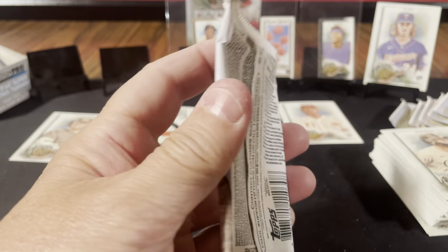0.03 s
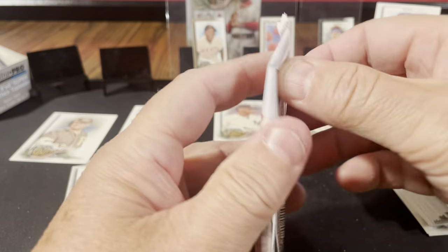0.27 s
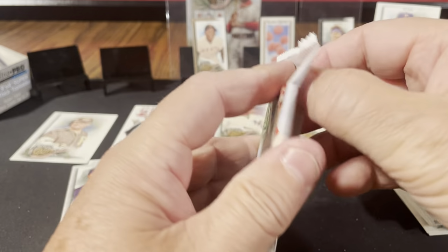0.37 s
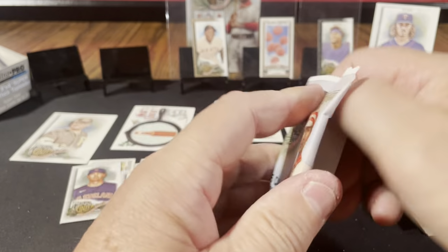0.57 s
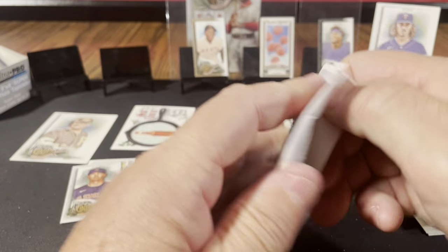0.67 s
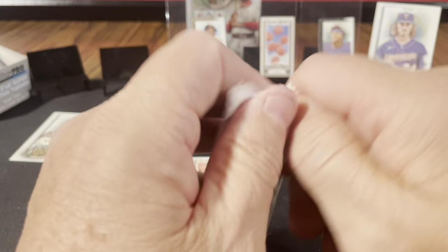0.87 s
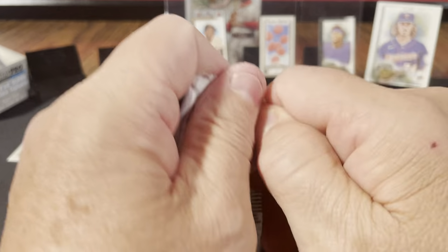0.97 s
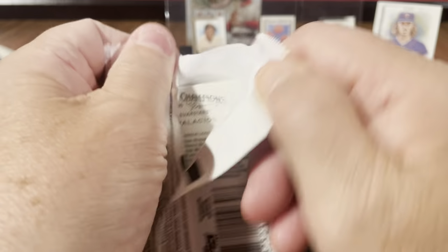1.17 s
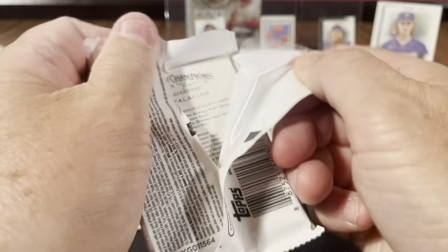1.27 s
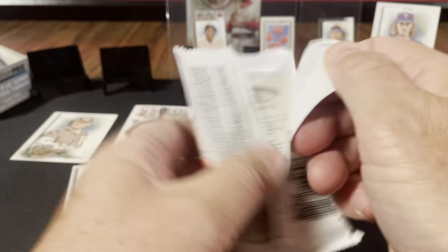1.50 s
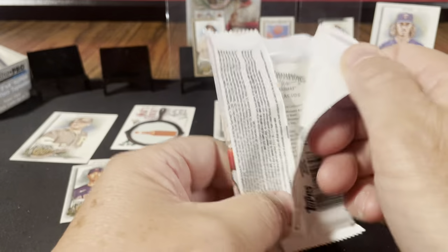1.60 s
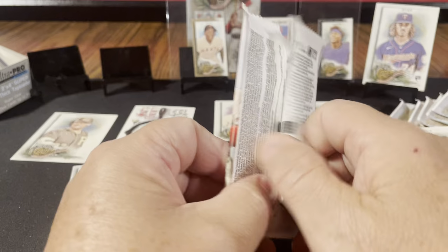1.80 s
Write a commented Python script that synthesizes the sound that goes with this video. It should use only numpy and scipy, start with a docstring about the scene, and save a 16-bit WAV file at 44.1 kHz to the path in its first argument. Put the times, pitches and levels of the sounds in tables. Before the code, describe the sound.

A foil card wrapper is pinched, crinkled and ripped open by hand, snapping sharply up close

```python
"""Sharp foil snaps, dense tearing and soft thuds: two hands pinch, crinkle and rip open a foil card wrapper.
It is held just in front of a camera with two microphone ports, in a small quiet room.
Snaps and crinkles are short noise bursts that ring a facet; tears and sliding are streams of tiny clicks;
thuds and the strong ring of some snaps are brief sine pulses, over a low noise rumble.
A faint noise tail answers as the room."""
import sys
import numpy as np
from scipy import signal
from scipy.fft import rfft, irfft, next_fast_len
from scipy.io import wavfile
from scipy.ndimage import uniform_filter1d, map_coordinates

SR = 44100
rng = np.random.default_rng(int(sys.argv[2]) if len(sys.argv) > 2 else 0)


def unload_audio(sound):
    """Save the sound as a 16-bit wav file, at the path given as the first command line argument."""
    columns = np.transpose(np.atleast_2d(sound))
    # keep every value between -1 and 1, then stretch to whole-number steps
    steps = np.round(np.clip(columns, -1, 1) * 32767)
    wavfile.write(sys.argv[1], SR, steps.astype(np.int16))


N = 81585

# buckling creases: t/s, level/dB before trim and tilt, bass tilt/dB, treble tilt/dB, facet ring f/Hz
CREASES = [(0.0114, -22.5, -7.5, -5, 7000), (0.2058, -22.5, -11, -10, 2210), (0.2125, -19, 2, -17, 2110),
           (0.2196, -9.5, -0.5, 4.5, 2240), (0.2226, -20, 2.5, 11.5, 6500), (0.2998, -17.5, -3.5, 5, 3900),
           (0.3142, -15.5, -3.5, -9, 3120), (0.332, -17.5, -1, -14, 3250), (0.3394, -14.5, -2, -3.5, 3000),
           (0.37, -32, -2, -15, 4220.0), (0.4003, -22, -7.5, -5.5, 2450), (0.4433, -20, 1.5, -7, 5400),
           (0.458, -12.5, -12, 6.5, 3400), (0.4631, -20.5, -7, 4, 3800), (0.4707, -12.5, 2.5, 5, 3620),
           (0.4769, -10.5, 2.5, 5.5, 1120), (0.483, -12, -18, -5, 3800), (0.4957, -19.5, -2.5, -2, 1400),
           (0.5142, -25, -14, 5, 6300), (0.527, -8.5, -5.5, 0.5, 3770), (0.5511, -13.5, -1, 4, 5670),
           (0.5643, -13.5, -4.5, 4, 6000), (0.5714, -20.5, 0.5, -13, 1940), (0.5811, -21.5, -3, 4.5, 5430),
           (0.5898, -29, -1, 2, 4010.0), (0.6288, -21, 4, 3, 3860), (0.6664, -10.5, -2, -0.5, 4970),
           (0.6726, -18, 4, -4, 5200), (0.702, -18.5, 4, 1, 2190), (0.7251, -14.5, -0.5, -29, 1050),
           (0.7504, -25.5, 3, -12, 3550), (0.7932, -12.5, -2, 2.5, 7100), (0.7994, -20.5, -23, 1, 6760.0),
           (0.829, -22, 3.5, 2, 5370), (0.8398, -10.5, -3, -1, 6100), (0.8598, -9, -4, -4.5, 2250),
           (0.8894, -7, -6.5, -1, 3130), (0.9042, -12, -2, -3, 4800), (0.909, -11.5, -11, -0.5, 5450),
           (0.9339, -13, -9, 4, 6700), (0.941, -21.5, -14, 15.5, 6940), (0.9491, -17.5, 0.5, 9, 5750),
           (0.9656, -21, -14, 9.5, 5080.0), (0.987, -5.5, -12.5, -7, 5600), (1.054, -7.5, -1.5, 1, 5000),
           (1.0596, -12, -2, 8, 6600), (1.0896, -7.5, -4, -1.5, 5150), (1.0928, -11, 1, -6, 5100),
           (1.105, -6.5, 1.5, -6, 790), (1.1295, -9.5, -12, 1, 2900), (1.1513, -14, -16, 7.5, 6670),
           (1.1967, -18.5, -24, -6, 4570.0), (1.2061, -8.5, -2.5, 3, 5000), (1.232, -20, -9, 15, 2670),
           (1.2657, -13, -7.5, -1.5, 5570), (1.3297, -40, 15.5, -14, 1150), (1.358, -36.5, 10, 4, 1250),
           (1.373, -19, 1, 3, 5300), (1.3832, -18.5, 0.5, 0.5, 3630), (1.4105, -43.5, 9.5, 4, 1150),
           (1.453, -10.5, 0.5, -2.5, 1600), (1.459, -13.5, -7, -3, 6400), (1.4704, -12, -7, 6, 5700),
           (1.4781, -9, 0, 0, 5300), (1.5, -12, -12, 1, 5200), (1.5444, -12.5, -4.5, -7.5, 3240),
           (1.565, -17.5, -8, -24, 4220.0), (1.5845, -14.5, -2.5, -49, 2400), (1.599, -16.5, -4, -7, 4500),
           (1.602, -20.5, 4, 5.5, 7100), (1.6894, -29.5, 0.5, -3, 3660.0), (1.7116, -28.5, -22, -2, 5170.0),
           (1.7246, -18, -4, -2.5, 1000), (1.7698, -30, 4.5, 1, 4470), (1.7986, -22.5, 0, -1, 4700),
           (1.8325, -19, -11, -8, 4440.0)]
# colour of a snap, close up: f/Hz, level/dB
FOIL_COLOUR = [(60, -36.5), (200, -9), (500, -7.5), (950, 2.5), (1800, -3), (3000, 0.5), (5300, -1),
               (8000, 1), (10500, -1), (13000, -6.5), (15500, -5)]
SNAP_TRIM_DB, SNAP_RISE_S, SNAP_T60_S = -0.5, 0.00043, 0.0076
# shake of the whole sheet, level relative to the crack
SHEET_DB, SHEET_T60_S = -18.5, 0.025
# soft noise swell around the onset of a snap, and how far ahead it starts
SWELL_LEAD_S, SWELL_DB = 0.002, -15.5
# facet ring: the higher it is, the broader
RING_DB, RING_WIDTH_HZ, RING_WIDTH_SHARE = 7.5, 275, 0.079
# the bass tilt acts below the first edge, the treble tilt above the second
BASS_HZ, TREBLE_HZ = 2160, 7100

# runs of tearing: start t/s, length/s, level/dB, bass tilt/dB
TEAR_RUNS = [(0.44, 0.016, -32, 2.5), (0.463, 0.025, -24.5, 1.5), (1.049, 0.054, -22.5, -0.5),
             (1.102, 0.031, -24, 8), (1.128, 0.027, -33, -4), (1.193, 0.036, -29, -0.5),
             (1.228, 0.0093, -22.5, -5), (1.237, 0.022, -32.5, 5), (1.284, 0.0064, -29, 3.5),
             (1.465, 0.028, -29.5, 7), (1.818, 0.037, -33, 3)]
# colour of the tearing seam: f/Hz, level/dB
SEAM_COLOUR = [(60, -21.5), (180, -3.5), (400, -5.5), (1000, -4), (2000, -2), (3500, 0.5), (5200, 1.5),
               (7500, -0.5), (11000, -4), (15500, -4)]
TEAR_RISE_S, TEAR_FALL_S, BREAKS_PER_S, BREAK_SPREAD_DB = 0.0017, 0.0065, 1500, 1.5
# the tear catches and slips: random points per second, swing to either side
CATCHES_PER_S, CATCH_SWING_DB = 330, 2

# small crinkles: level relative to the sliding, scatter to either side, range of the facet rings
CRINKLES_PER_S, CRINKLE_DB, CRINKLE_SPREAD_DB = 60, 3.5, 3.5
CRINKLE_LOW_HZ, CRINKLE_HIGH_HZ = 604, 4030

# foil sliding under the fingers: t/s, level/dB
SLIDE_LEVEL = [(0, -52), (.1, -68), (.19, -82), (.21, -35.5), (.265, -51.5), (.295, -45.5), (.42, -49.5),
               (.49, -43), (.54, -42), (.59, -35.5), (.61, -52), (.65, -51.5), (.68, -39), (.78, -42),
               (.83, -36), (.92, -35), (1.02, -43), (1.1, -22.5), (1.17, -47.5), (1.27, -36), (1.32, -57.5),
               (1.37, -43), (1.44, -47), (1.52, -34.5), (1.61, -39), (1.66, -50.5), (1.79, -47),
               (1.85, -53)]
# colour of the sliding: f/Hz, level/dB
RUB_COLOUR = [(60, -16.5), (200, -0.5), (500, -1.5), (1000, -4.5), (1800, -3.5), (3500, 2.5), (5200, 2.5),
              (8000, 1.5), (11000, 0), (15500, -12)]
SLIDE_GRAINS_PER_S, SLIDE_SPREAD_DB = 3500, 3.5

# soft thuds and the strong ring of some snaps: centre t/s, level/dB, f/Hz, bell half-length/s (to 1/e)
PULSES = [(.2206, -10, 2318, 0.0012), (0.242, -49.5, 65, 0.011), (0.366, -41, 46, 0.02),
          (0.412, -52.5, 61.7, 0.02), (0.501, -45.5, 84.8, 0.012), (0.577, -37, 403, 0.0047),
          (1.1, -44.5, 56, 0.044), (1.119, -31.5, 185.7, 0.01), (1.2867, -26.5, 602, 0.0015),
          (1.465, -45, 160, 0.011), (1.483, -21.5, 1204, 0.0015), (1.572, -47, 72.3, 0.033)]
# colour of the handling rumble: f/Hz, level/dB
RUMBLE_COLOUR = [(20, -33), (50, -1.5), (250, -11), (3000, -43)]
# handling rumble: t/s, level/dB
RUMBLE_LEVEL = [(.19, -71.5), (.25, -66), (.7, -63.5), (1.12, -52.5), (1.35, -60.5), (1.52, -55),
                (1.7, -63)]

# between the microphone ports: f/Hz, phase by which left leads/rad
PORT_LEAD = [(1400, 0), (2700, 1.23), (3800, 0.81), (5200, -0.55), (6460, -0.95), (7840, -2.5),
             (8600, -3.5), (10900, -6.5), (12300, -6), (14300, -9.5), (16000, -9.5)]
# between the microphone ports: f/Hz, left over right/dB
PORT_LEVEL = [(60, 1), (200, 3), (1300, 2.5), (4400, 4.5), (8100, 0)]
# between the microphone ports: f/Hz, likeness (0-1)
PORT_LIKENESS = [(100, 0.79), (700, 0.93), (2400, 0.83), (5500, 0.8), (8200, 1), (11000, 0.65), (15000, 1)]

# decay of the small room: f/Hz, t60/s
ROOM_DECAY = [(2400, 0.24), (6000, 0), (14000, 0.38)]
# colour of the room tail: f/Hz, level/dB
ROOM_TONE = [(1400, -3.5), (2350, 2.5), (3400, 0), (14000, -4.5)]
ROOM_DB = -21.5
TOP_HZ = 15900  # band limit of the camera


def snaps():
    """The large creases buckle close up, each with its own weight and brightness."""
    out = np.zeros((2, N))
    for s, db, bass_db, treble_db, ring_hz in CREASES:
        def tilt(hz):
            return bass_db * below(hz, BASS_HZ) + treble_db * (1 - below(hz, TREBLE_HZ))
        snap = coloured(crack(ring_hz), tilt)
        add(out, s - SWELL_LEAD_S, amp(db + SNAP_TRIM_DB) * snap)
    return out


def crack(ring_hz):
    """A buckling crease: a soft swell of noise, a crack of milliseconds that rings its facet, a sheet shake."""
    t = np.arange(2048) / SR - SWELL_LEAD_S
    after = np.maximum(t, 0)
    rise = 1 - np.exp(-(after / SNAP_RISE_S) ** 2)
    snap = amp(-60 * after / SNAP_T60_S)
    sheet = amp(SHEET_DB - 60 * after / SHEET_T60_S)
    swell = amp(SWELL_DB) * np.exp(-2 * np.abs(t) / SWELL_LEAD_S)

    def facet(hz):
        width_hz = RING_WIDTH_HZ + RING_WIDTH_SHARE * ring_hz
        return along(FOIL_COLOUR, hz) + RING_DB * np.exp(-((hz - ring_hz) / width_hz) ** 2)

    x = coloured(burst(rise * (snap + sheet) + swell), facet)
    # the energy of 1 ms at rms 1
    return x * np.sqrt(SR / 1000 / np.sum(x ** 2, axis=1, keepdims=True))


def burst(shape):
    """A pair of noise bursts of the given shape, broadly flat in spectrum but ragged in detail."""
    x = shape * rng.standard_normal((2, len(shape)))
    grid = np.fft.rfftfreq(len(shape), 1 / SR)
    power = np.abs(rfft(x)) ** 2
    smooth = np.abs(uniform_filter1d(uniform_filter1d(power, size=101), size=101))
    # dividing by the smoothed spectrum leaves only the fine detail
    flat = [coloured(c, lambda hz: -10 * np.log10(np.interp(hz, grid, p) + 1e-12))
            for c, p in zip(x, smooth)]
    return np.array(flat)


def tearing():
    """The seam gives way in runs of dense tiny breaks, catching and slipping as it goes."""
    out, t = np.zeros((2, N)), np.arange(N) / SR
    catch = map_coordinates(2 * rng.random(N) - 1, [t * CATCHES_PER_S])
    uneven = grains(BREAKS_PER_S, BREAK_SPREAD_DB) * amp(CATCH_SWING_DB * catch)
    breaks = coloured(uneven, lambda hz: along(SEAM_COLOUR, hz))
    for s, length, db, bass_db in TEAR_RUNS:
        corners = [s - TEAR_RISE_S, s, s + length, s + length + TEAR_FALL_S]
        run = np.interp(t, corners, [0, 1, 1, 0]) ** 2
        piece = run * coloured(breaks, lambda hz: bass_db * below(hz, BASS_HZ))
        # the level holds inside the run, however short it is
        out += amp(db) * unit(piece) * np.sqrt(np.mean(run ** 2))
    return out


def crinkles():
    """Small creases give way at random times, louder where the sliding is louder."""
    out, slide_db = np.zeros((2, N)), curve(SLIDE_LEVEL)
    for when, size, facet in rng.random((round(CRINKLES_PER_S * N / SR), 3)):
        db = slide_db[int(when * N)] + CRINKLE_DB + CRINKLE_SPREAD_DB * (2 * size - 1)
        ring_hz = CRINKLE_LOW_HZ * (CRINKLE_HIGH_HZ / CRINKLE_LOW_HZ) ** facet
        add(out, when * N / SR, amp(db) * crack(ring_hz))
    return out


def sliding():
    """Foil rubs on skin and cards: many tiny clicks merge into a fine grainy hiss."""
    clicks = grains(SLIDE_GRAINS_PER_S, SLIDE_SPREAD_DB)
    hiss = unit(coloured(clicks, lambda hz: along(RUB_COLOUR, hz)))
    return amp(curve(SLIDE_LEVEL)) * hiss


def hands():
    """A low handling rumble, with soft thuds, and short sine pulses for the strong ring of some snaps."""
    noise = coloured(rng.standard_normal((2, N)), lambda hz: along(RUMBLE_COLOUR, hz))
    out = amp(curve(RUMBLE_LEVEL)) * unit(noise)
    t = np.arange(N) / SR
    for s, db, hz, length in PULSES:
        bell = np.exp(-((t - s) / length) ** 2)
        # only in the sound that both ports share
        out[0] += amp(db) * bell * np.sin(2 * np.pi * (hz * t + rng.random()))
    return out


def ports(pair):
    """Two microphone ports hear the near sound mostly alike, apart in phase and level."""
    m = next_fast_len(N + SR // 2)
    hz = np.fft.rfftfreq(m, 1 / SR)
    # mixing two unrelated signals at this angle gives the wanted likeness
    turn = np.arccos(np.clip(along(PORT_LIKENESS, hz), 0, 1)) / 2
    shared, own = rfft(pair, m) * [np.cos(turn), np.sin(turn)]
    # each port takes half of the level and phase difference
    phase = np.interp(hz, *np.transpose(PORT_LEAD))
    lean = amp(along(PORT_LEVEL, hz) / 2) * np.exp(.5j * phase)
    return irfft(np.array([(shared + own) * lean, (shared - own) / lean]), m)[:, :N]


def room(x):
    """The room's short tail, as decaying coloured noise that differs at each port."""
    hz, t, z = signal.stft(rng.standard_normal((2, SR // 2)), SR, nperseg=256)
    colour_db = along(ROOM_TONE, hz)[:, None]
    decay_db = -60 * t / along(ROOM_DECAY, hz)[:, None]
    tail = signal.istft(z * amp(colour_db + decay_db), SR, nperseg=256)[1]
    return signal.fftconvolve(x[None], tail / np.linalg.norm(tail[0]), axes=1)[:, :N]


def grains(per_s, spread_db):
    """Two unrelated noise streams of tiny clicks of uneven size that share their moments."""
    extra_db = spread_db * np.minimum(rng.exponential(size=N), 4)
    size = (rng.random(N) < per_s / SR) * amp(extra_db)
    power = signal.lfilter([1], [1, -.85], size ** 2)  # each click fades over a few samples
    return unit(np.sqrt(power) * rng.standard_normal((2, N)))


def coloured(x, gain_db):
    """x through a causal minimum-phase filter with the gain gain_db(Hz)."""
    n = x.shape[-1]
    m = 2 * next_fast_len(n)
    cep = irfft(np.log(amp(gain_db(np.fft.rfftfreq(m, 1 / SR)))), m)
    # folding the cepstrum forward makes the filter causal
    cep[1:m // 2] *= 2
    cep[m // 2 + 1:] = 0
    return irfft(rfft(x, m) * np.exp(rfft(cep)), m)[..., :n]


def below(hz, edge_hz):
    """A smooth step from 1 under the edge to 0 over it."""
    return 1 / (1 + (hz / edge_hz) ** 6)


def along(points, hz):
    """(Hz, value) points read on a log frequency axis."""
    f, v = np.transpose(points)
    return np.interp(np.log(hz + 1), np.log(f + 1), v)


def curve(rows):
    """(s, value) points read at every sample."""
    return np.interp(np.arange(N) / SR, *np.transpose(rows))


def add(track, s, x):
    """Mix x into the track at time s."""
    i = max(0, round(s * SR))
    part = track[..., i:i + x.shape[-1]]
    part += x[..., :part.shape[-1]]


def amp(db):
    """Decibels to gain."""
    return 10 ** (np.asarray(db) / 20)


def unit(x):
    """x at rms 1."""
    return x / np.sqrt(np.mean(x ** 2) + 1e-20)


def scene():
    """The wrapper close to the ports, and the room's answer to the sound they share."""
    near = snaps() + tearing() + crinkles() + sliding() + hands()
    return ports(near) + amp(ROOM_DB) * room(near[0])


def record(dry):
    """The camera rounds off the highest peaks and keeps nothing above its band limit."""
    held = dry / (1 + np.abs(dry / .9) ** 6) ** (1 / 6)
    m = next_fast_len(N + SR // 2)
    return irfft(rfft(held, m) * (np.fft.rfftfreq(m, 1 / SR) < TOP_HZ), m)[:, :N]


dry = scene()
out = record(dry)
unload_audio(out)
```